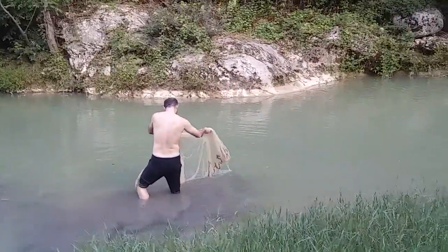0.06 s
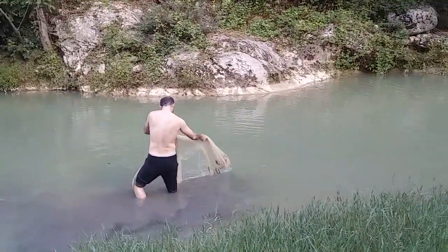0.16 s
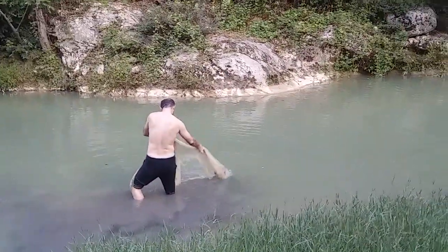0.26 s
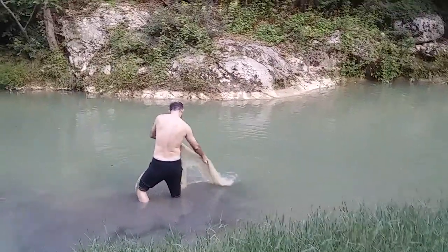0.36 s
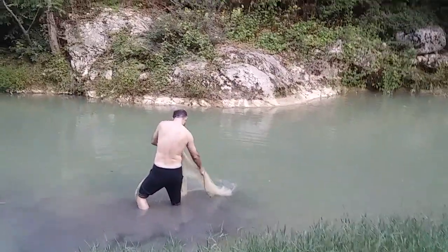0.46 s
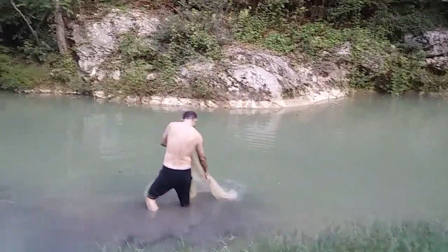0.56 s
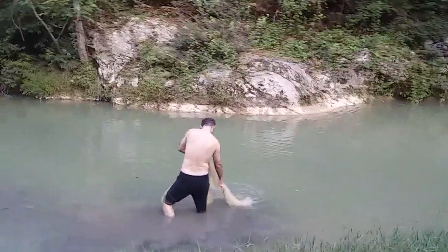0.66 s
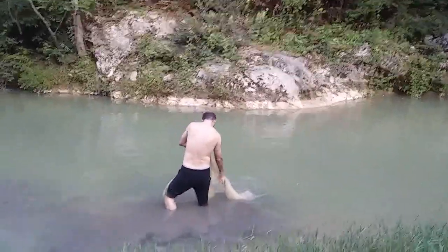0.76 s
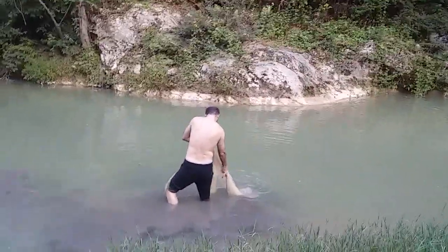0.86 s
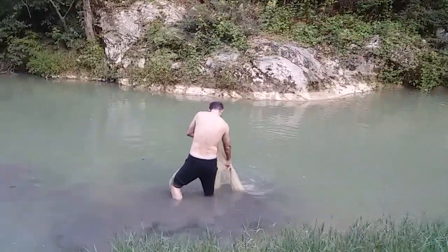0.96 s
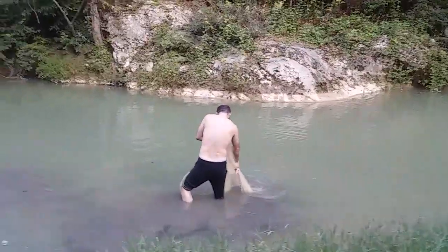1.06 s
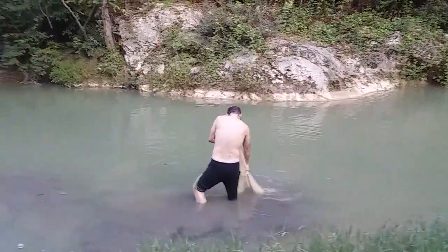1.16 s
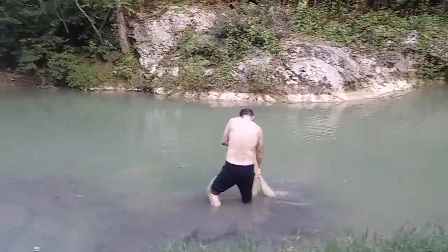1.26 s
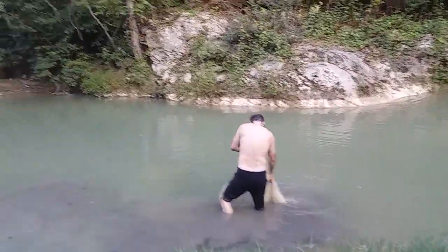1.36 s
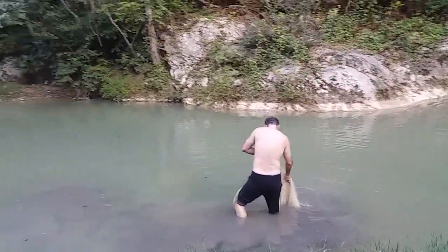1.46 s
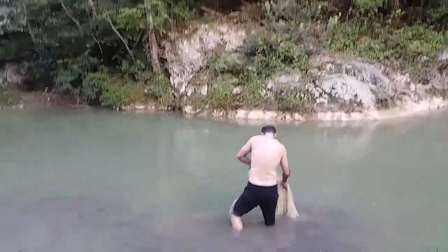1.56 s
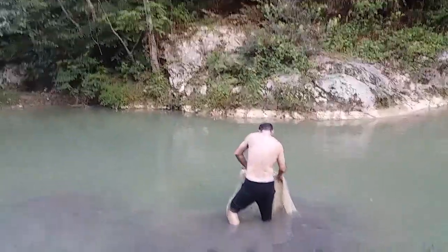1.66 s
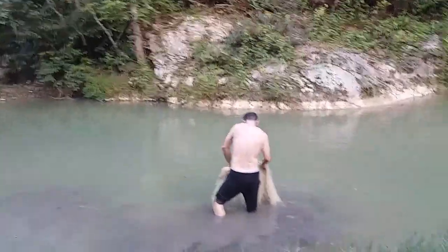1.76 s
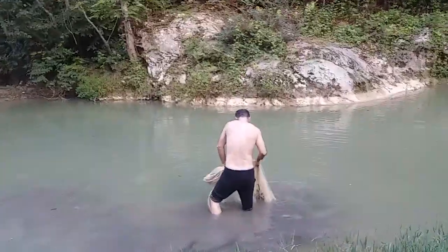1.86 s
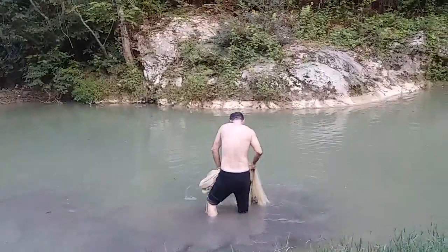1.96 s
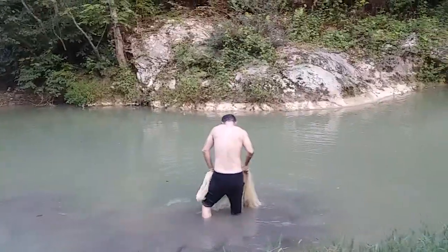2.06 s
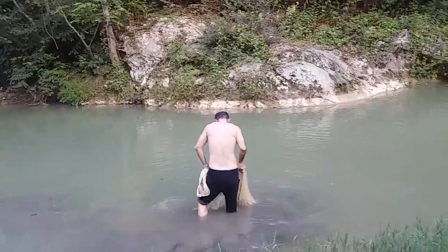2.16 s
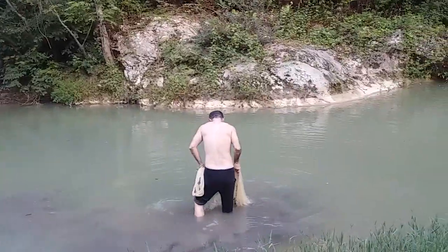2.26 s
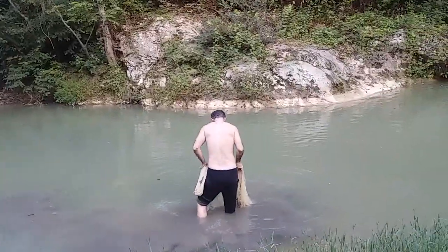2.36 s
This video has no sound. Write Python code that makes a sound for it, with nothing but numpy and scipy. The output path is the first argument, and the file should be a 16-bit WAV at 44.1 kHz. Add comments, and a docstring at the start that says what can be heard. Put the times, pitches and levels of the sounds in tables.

```python
"""A wet net, lowered into a slow stream by a man standing knee-deep, lands in a long spray of drops and bubbles.
Spray is random ticks through filters; bubbles, drips and ringing pops are decaying sines of rising pitch.
Crisp crackles (filtered noise bursts) and short rustles (gated ticks) follow close by, like handling or grass.
Water sloshes round his legs (bubbles and noise bands); one soft bump is a sum of decaying sines.
Behind: gently wavering stream wash, faint high shimmer, one narrow noise chirp, thin sine whine."""
import sys
import numpy as np
from scipy import signal
from scipy.fft import rfft, irfft, next_fast_len
from scipy.io import wavfile

SR = 44100
rng = np.random.default_rng(int(sys.argv[2]) if len(sys.argv) > 2 else 0)


def to_wav(sig):
    """Store sig (one row per channel, or 1-D mono) as 16-bit WAV at the path in sys.argv[1].

    Samples outside -1..1 are clipped; the rate is SR.
    """
    pcm = np.clip(np.atleast_2d(sig), -1, 1) * 32767
    pcm = np.round(pcm).astype(np.int16)
    wavfile.write(sys.argv[1], SR, pcm.T)  # frames by channels


N = 108045
T = np.arange(N) / SR  # s

# Stream wash filter: (frequency [Hz], relative gain [dB])
STREAM_COLOUR = [(25, -52), (45, -4.5), (65, -2.5), (125, 1.5), (190, -7.5), (340, -9), (520, -3), (800, 4),
                 (1300, 4), (1900, 9), (2600, -0.5), (3200, 4.5), (4300, -1.5), (5600, -11), (8000, -42),
                 (9300, -31.5), (12000, -25), (16000, -23)]
STREAM_DB, STREAM_WAVER_DB = -56, 1.6

# High shimmer filter: (frequency [Hz], relative gain [dB])
SHIMMER_GAIN = [(5000, -28), (5900, -11), (6500, -1.5), (7300, -3), (8000, -7), (9000, -23.5), (11000, -76)]
# Shimmer envelope: (time [s], level [dB])
SHIMMER_LEVEL = [(0, -72), (.9, -66.5), (1.03, -63.5), (1.1, -65), (1.19, -61.5), (1.31, -61), (1.41, -65),
                 (1.5, -59), (1.56, -66.5), (2.5, -66)]
SHIMMER_WAVER_DB = 0.36
WHINE_HZ, WHINE_RMS_DB = 14592, -76.5

# Envelope of water thrown up by the net: (time [s], level [dB])
SPLASH_LEVEL = [(0, -53.5), (.035, -51.5), (.11, -58), (.15, -50), (.2, -54.5), (.25, -48), (.29, -48.5),
                (.335, -43), (.36, -48.5), (.388, -36), (.407, -43), (.42, -46), (.48, -50.5), (.6, -67),
                (.7, -59)]
# Fine spray envelope: (time [s], level [dB])
SPRAY_LEVEL = [(0, -66), (.12, -70), (.23, -65), (.255, -53.5), (.28, -63), (.335, -50.5), (.37, -53),
               (.408, -41.5), (.42, -58), (.5, -68)]
# Drop patter filter: (frequency [Hz], relative gain [dB])
PATTER_COLOUR = [(200, -41), (340, -21.5), (480, -3), (900, -10.5), (1400, -6), (2400, -2.5), (3500, 4),
                 (5000, -3.5), (7500, -3), (9500, -26.5), (16000, -59)]
# Fine spray filter: (frequency [Hz], relative gain [dB])
SPRAY_GAIN = [(6000, -46), (10000, -22), (11500, -6.5), (13000, 3), (16000, -3)]
DROPS_PER_S, DROP_SPREAD_DB, PATTER_DB = 5000, 4.5, -3
BUBBLES_PER_S, BUBBLE_LOW_HZ, BUBBLE_HIGH_HZ, BUBBLE_DB = 520, 801, 6410, -5.5
BUBBLE_DECAY_CYCLES, BUBBLE_RISE_PER_DECAY, BUBBLE_SPREAD_DB = 5.58, 0.0666, 4
# Single drips, and short ringing pops within the crackles: (time [s], frequency [Hz], level [dB])
DRIP_AND_POP_EVENTS = [(0.033, 1340, -43.5), (0.071, 1450, -38), (.073, 4840, -39), (.141, 4540, -33.5),
                       (.145, 3880, -30.5), (0.1468, 5100, -35), (.24, 986, -45), (.266, 4630, -35.5),
                       (.281, 5200, -34), (.305, 4640, -30), (0.323, 3760, -28.5), (.339, 4370, -32),
                       (0.344, 1260, -48), (0.352, 2670, -43), (0.339, 1300, -39), (.369, 4180, -31),
                       (0.375, 3270, -29), (0.383, 1070, -60), (.5446, 2270, -24.5), (1.643, 3170, -29),
                       (1.737, 2950, -25), (2.0302, 3120, -29), (2.0352, 3510, -20.5), (2.0363, 3360, -26),
                       (2.0414, 3600, -28), (2.237, 1385, -49)]

# Sloshes round legs and net: (centre time [s], swell length [s], centre frequency [Hz], level [dB])
SLOSH_EVENTS = [(.11, .09, 756, -62), (.245, 0.024, 740, -54.5), (0.389, 0.039, 523, -57),
                (0.482, 0.084, 606, -53.5), (.541, .018, 590, -47), (.93, .08, 716, -60.5),
                (1.381, 0.037, 595, -58), (1.501, 0.054, 913, -51), (1.612, .02, 277, -61),
                (1.497, .025, 2030, -49), (2.105, .03, 603, -55), (2.24, 0.077, 960, -68),
                (2.419, 0.048, 600, -70)]
SLOSH_BUBBLES_PER_S, SLOSH_PITCH_RATIO, SLOSH_DECAY_CYCLES = 500, 1.4, 2.54
SLOSH_Q, SLOSH_CLOUD_GAIN, SLOSH_WASH_GAIN = 1.73, 0.54, 0.44

# Sharp close crackles: (time [s], relative body level [dB], relative crisp top level [dB])
CRACKLE_EVENTS = [(0.1454, -46, -47), (.4901, -47, -47), (0.494, -42, -33.5), (.5016, -50, -38),
                  (0.5137, -45, -39), (0.5152, -37, -39), (.5287, -32.5, -42), (0.5364, -31, -32),
                  (0.5406, -41, -27.5), (0.5446, -22, -24), (0.554, -28, -29.5), (0.6282, -55, -40.5),
                  (0.639, -28.5, -33), (0.6466, -35.5, -43), (0.6554, -27.5, -33), (.6637, -57, -41),
                  (0.675, -31.5, -32), (0.683, -34.5, -29), (0.7014, -37, -37), (.7116, -42, -39),
                  (.7221, -37.5, -32.5), (0.732, -30, -33.5), (0.7407, -38, -40), (0.7452, -66, -34),
                  (0.7698, -42, -37), (.7736, -39, -33), (.777, -32, -54), (0.784, -58, -49),
                  (0.8003, -49, -39), (0.8407, -38, -42), (0.8439, -48, -33), (0.854, -48, -41),
                  (0.8665, -41.5, -57), (1.5925, -40, -50.5), (1.6074, -42, -38), (1.6394, -48, -43),
                  (1.6427, -34, -42.5), (1.6655, -31.5, -57), (1.6698, -35, -36), (1.6828, -28.5, -34.5),
                  (1.6917, -34.5, -38), (1.7374, -32.5, -36.5), (1.7522, -44, -36.5), (1.7635, -47, -43),
                  (1.768, -32, -40.5), (1.7835, -28, -44), (1.8013, -36, -42), (2.0361, -35, -25.5),
                  (2.041, -46, -35), (2.059, -38, -33.5), (2.062, -32.5, -46), (2.0749, -37, -38),
                  (2.086, -31, -33.5), (2.108, -28, -28.5), (2.1251, -32, -32.5), (2.1398, -33, -40),
                  (2.1463, -33, -36), (2.1505, -35, -36), (2.185, -46, -45.5), (2.198, -51, -46),
                  (2.36, -49, -52)]
CRACKLE_BODY_DB, CRACKLE_TOP_DB = 13.5, 16  # added to the table levels
SNAP_RISE_S, SNAP_DECAY_S, TAIL_DECAY_S, TAIL_DB = 0.00013, 0.00043, 0.0025, -7.5
# Crackle and rustle body filter: (frequency [Hz], relative gain [dB])
BODY_COLOUR = [(120, -29), (400, -19), (750, -6.5), (1500, 1.5), (2400, 0.5), (3300, 5), (4300, -5),
               (5500, -6), (9000, -42), (16000, -56)]
# Crackle and rustle crisp top filter: (frequency [Hz], relative gain [dB])
TOP_COLOUR = [(2500, -29.5), (4500, -12.5), (5800, -8.5), (7000, 0.5), (7800, 0.5), (8500, -9),
              (9500, -22.5), (11500, -21.5), (13000, -19), (16000, -23.5)]

# Close rustles: (start [s], length [s], body level [dB], top level [dB], body centre frequency [Hz])
RUSTLE_EVENTS = [(0.443, 0.093, -49, -47.5, 1910), (0.483, 0.029, -40.5, -47.5, 1680),
                 (0.531, 0.024, -31.5, -42, 2130), (.55, 0.055, -57, -76, 2050),
                 (0.626, 0.17, -56.5, -50, 1600), (0.771, 0.12, -57.5, -54, 2060),
                 (0.875, 0.062, -58.5, -57, 1830), (0.896, 0.081, -63, -66.5, 2500),
                 (1.597, 0.15, -52, -57.5, 2040), (1.741, 0.077, -38.5, -46, 2420),
                 (1.804, 0.16, -62, -63, 4900), (1.945, 0.13, -51.5, -58.5, 2700),
                 (2.016, 0.057, -45.5, -56, 3400), (2.052, .068, -44, -46.5, 2670),
                 (2.064, 0.099, -49, -51.5, 1240), (2.143, 0.067, -79, -62, 3500)]
RUSTLE_TICKS_PER_S, RUSTLE_SPREAD_DB, RUSTLE_Q = 3500, 2, 1
RUSTLE_ATTACK_S, RUSTLE_RELEASE_S = 0.011, 0.016

# Faint narrow chirps: (centre time [s], swell length [s], frequency [Hz], level [dB])
CHIRP_EVENTS = [(1.031, 0.065, 3180, -57)]
CHIRP_Q = 34

# Bump modes: (frequency [Hz], relative level [dB])
BUMP_PARTIALS = [(100, 2), (150, 0.5), (235, -0.5), (340, -7.5), (690, 1.5)]
BUMP_S, BUMP_DB, BUMP_RISE_S, BUMP_DECAY_S, BUMP_HIGHPASS_HZ = 1.644, -40.5, 0.004, 0.0056, 60

BANK_DB, BANK_DECAY_S = -17, 0.085
RUMBLE_CUT_HZ, TOP_CUT_HZ = 44.8, 16000


def amp(db):
    """Amplitude ratio from dB."""
    return 10 ** (np.asarray(db) / 20)


def unit(x):
    """Scale to rms 1."""
    return x / np.sqrt(np.mean(x ** 2) + 1e-20)


def add(out, time_s, sound):
    """Mix a sound in at time_s, cut at the end of the scene."""
    i = int(np.clip(time_s * SR, 0, N - 1))
    out[i:i + len(sound)] += sound[:N - i]


def curve(points):
    """Gain envelope, linear in dB; -120 dB after the last point."""
    time_s, db = np.array(points).T
    return amp(np.interp(T, time_s, db, right=-120))


def swell(centre_s, length_s):
    """Gaussian rise and fall, down to exp(-2) at length_s either side."""
    return np.exp(-2 * ((T - centre_s) / length_s) ** 2)


def colour(x, points):
    """Minimum-phase filter of unit energy, dB interpolated over log frequency."""
    hz, db = np.array(points).T
    n = 2 * next_fast_len(N)
    bin_hz = np.arange(n // 2 + 1) * SR / n
    gain = unit(amp(np.interp(np.log(bin_hz + 1), np.log(hz), db)))
    # Folding the cepstrum makes the response causal.
    cepstrum = irfft(np.log(gain))
    cepstrum[1:n // 2] *= 2
    cepstrum[n // 2 + 1:] = 0
    response = np.exp(rfft(cepstrum))
    return irfft(rfft(x, n) * response)[:N]


def band(x, hz, q):
    """One resonance, scaled to rms 1."""
    b, a = signal.iirpeak(hz, max(q, hz / 15000), fs=SR)
    return unit(signal.lfilter(b, a, x))


def highpass(x, cut_hz):
    """Second-order Butterworth high-pass."""
    return signal.sosfilt(signal.butter(2, cut_hz, "high", fs=SR, output="sos"), x)


def walk(points_per_s):
    """Random values joined by straight lines, rms 1."""
    return unit(np.interp(T * points_per_s, np.arange(N), rng.standard_normal(N)))


def ticks(per_s, spread_db):
    """Random impacts of uneven size and either sign, rms 1."""
    size = amp(spread_db * np.minimum(rng.exponential(size=N), 4))
    hit = rng.random(N) < per_s / SR
    return unit(hit * size * rng.choice([-1, 1], N))


def stream():
    """Stream wash: dense coloured ticks, level wavering at random."""
    wash = colour(ticks(per_s=14000, spread_db=2.5), STREAM_COLOUR)
    return wash * amp(STREAM_DB + STREAM_WAVER_DB * walk(14))


def shimmer(hiss):
    """High shimmer: coloured noise under an envelope with fast, slight waver."""
    high = colour(hiss, SHIMMER_GAIN)
    return high * curve(SHIMMER_LEVEL) * amp(SHIMMER_WAVER_DB * walk(40.2))


def whine():
    """Thin whine: one steady sine."""
    return amp(WHINE_RMS_DB) * np.sqrt(2) * np.sin(2 * np.pi * WHINE_HZ * T)


def bubble(hz, cycles=BUBBLE_DECAY_CYCLES):
    """A bubble rings as a sine, decaying by 1/e in the given cycles while its pitch rises."""
    age = T[:int(5 * cycles / hz * SR)] * hz / cycles  # in decay times
    ring = np.sin(2 * np.pi * cycles * age * (1 + BUBBLE_RISE_PER_DECAY * age / 2))
    attack = 1 - np.exp(-age * cycles * 2)
    return ring * np.exp(-age) * attack


def bubbles(per_s, low_hz, high_hz):
    """Cloud of bubbles at random times, pitches and sizes, rms 1."""
    out = np.zeros(N)
    ratio = high_hz / low_hz
    for when, pitch, size in rng.random(size=(4000, 3))[:int(per_s * N / SR)]:
        level = amp(-BUBBLE_SPREAD_DB * np.log(size + 0.039))
        tilt = ratio ** (pitch * .7)  # higher bubbles louder
        add(out, when * N / SR, bubble(low_hz * ratio ** pitch) * level * tilt)
    return unit(out)


def splash():
    """Net meets water: drop impacts and bubbles share one envelope, fine spray has its own."""
    patter = colour(ticks(DROPS_PER_S, DROP_SPREAD_DB), PATTER_COLOUR)
    cloud = bubbles(BUBBLES_PER_S, BUBBLE_LOW_HZ, BUBBLE_HIGH_HZ)
    thrown = curve(SPLASH_LEVEL) * (amp(PATTER_DB) * patter + amp(BUBBLE_DB) * cloud)
    spray = colour(ticks(per_s=1800, spread_db=4.0), SPRAY_GAIN)
    return thrown + curve(SPRAY_LEVEL) * spray


def drips_and_pops():
    """Single drips, and short ringing pops within the crackles: decaying sines of rising pitch."""
    out = np.zeros(N)
    for time_s, hz, db in DRIP_AND_POP_EVENTS:
        add(out, time_s, amp(db) * bubble(hz))
    return out


def sloshes():
    """Each slosh is a short swell of churned water (a noise band) and larger bubbles."""
    out, churn = np.zeros(N), rng.standard_normal(N)
    for centre_s, length_s, hz, db in SLOSH_EVENTS:
        cloud = np.zeros(N)
        count = int(SLOSH_BUBBLES_PER_S * length_s) + 1
        for a, b, pitch, size in rng.random(size=(100, 4))[:count]:
            time_s = centre_s + length_s * (a + b - 1) * 0.76
            bubble_hz = hz * SLOSH_PITCH_RATIO ** (2 * pitch - 1)
            add(cloud, time_s, size * bubble(bubble_hz, SLOSH_DECAY_CYCLES))
        cloud = unit(cloud) * np.sqrt(length_s * SR / N)  # energy grows with length_s
        wash = band(band(churn, hz, SLOSH_Q), hz, SLOSH_Q) * swell(centre_s, length_s)
        out += amp(db) * (SLOSH_CLOUD_GAIN * cloud + SLOSH_WASH_GAIN * wash)
    return out


def snap(response):
    """A sub-millisecond noise burst rings the response; a weaker, longer tail follows."""
    t = T[:SR // 50] - T[SR // 1000]  # 1 ms lead-in
    noise = rng.standard_normal((2, len(t)))
    burst = noise[0] * np.exp(-abs(t) / np.where(t < 0, SNAP_RISE_S, SNAP_DECAY_S))
    burst += 2.52 * (t == 0)  # click at the peak
    scatter = noise[1] * (t > 0) * np.exp(-abs(t) / TAIL_DECAY_S)
    head = np.convolve(burst, response)
    tail = np.convolve(scatter, response)
    return head / np.linalg.norm(head) + amp(TAIL_DB) * tail / np.linalg.norm(tail)


def crackles():
    """Each crackle is two snaps: a mid body and a crisp top."""
    out = np.zeros(N)
    impulse = 1. * (T == 0)
    body = colour(impulse, BODY_COLOUR)[:512]
    top = colour(impulse, TOP_COLOUR)[:512]
    for time_s, body_db, top_db in CRACKLE_EVENTS:
        body_snap = amp(body_db + CRACKLE_BODY_DB) * snap(body)
        top_snap = amp(top_db + CRACKLE_TOP_DB) * snap(top)
        add(out, time_s - .0008, body_snap + top_snap)  # offsets most of the lead-in
    return out


def rustles():
    """Close rustles, like handling or grass: gated dense ticks with a mid body and a crisp top."""
    grain, out = ticks(RUSTLE_TICKS_PER_S, RUSTLE_SPREAD_DB), np.zeros(N)
    mid, crisp = colour(grain, BODY_COLOUR), colour(grain, TOP_COLOUR)
    for start_s, length_s, body_db, top_db, hz in RUSTLE_EVENTS:
        attack = np.clip((T - start_s) / RUSTLE_ATTACK_S, 0, 1)
        release = np.clip((start_s + length_s - T) / RUSTLE_RELEASE_S, 0, 1)
        body = amp(body_db) * band(mid, hz, RUSTLE_Q)
        out += attack * release * (body + amp(top_db) * crisp)
    return out


def chirps(hiss):
    """Faint chirp: a swell of narrow-band noise."""
    out = np.zeros(N)
    for centre_s, length_s, hz, db in CHIRP_EVENTS:
        out += amp(db) * swell(centre_s, length_s) * band(hiss, hz, CHIRP_Q)
    return out


def bump():
    """One soft, low knock: sine modes under a shared rise and decay."""
    t = np.maximum(T - BUMP_S, 0)
    modes = sum(amp(db) * np.sin(2 * np.pi * hz * t) for hz, db in BUMP_PARTIALS)
    knock = np.exp(-t / BUMP_DECAY_S) * (1 - np.exp(-t / BUMP_RISE_S)) * modes
    return amp(BUMP_DB) * highpass(knock, BUMP_HIGHPASS_HZ)


def banks(near):
    """Faint scatter off the banks: convolution with decaying noise of unit energy."""
    scatter = rng.standard_normal(N) * np.exp(-T / BANK_DECAY_S)
    return amp(BANK_DB) * signal.fftconvolve(near, scatter / np.linalg.norm(scatter))[:N]


def scene():
    """Near sounds with bank scatter, over the unscattered background."""
    near = splash() + drips_and_pops() + sloshes() + rustles() + crackles() + bump()
    scattered = near + banks(near)
    wash = stream()
    hiss = rng.standard_normal(N)  # shared by shimmer and chirps
    background = wash + shimmer(hiss) + chirps(hiss) + whine()
    return (scattered + background)[None]


def record(dry):
    """Cut the rumble gently and the top steeply."""
    dry = highpass(dry, RUMBLE_CUT_HZ)
    # 0.2 dB passband ripple, 70 dB stopband
    return signal.sosfilt(signal.ellip(10, .2, 70, TOP_CUT_HZ, fs=SR, output="sos"), dry)


dry = scene()
out = record(dry)
to_wav(out)
```